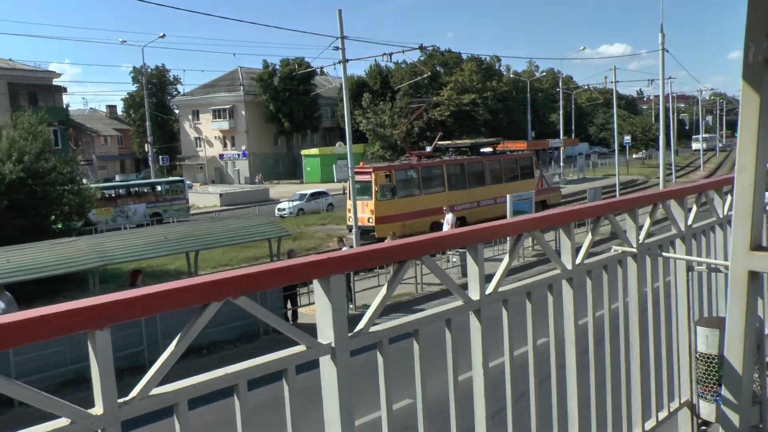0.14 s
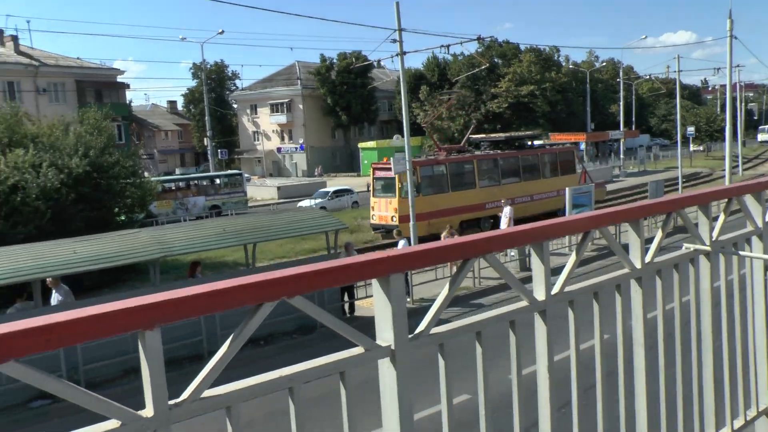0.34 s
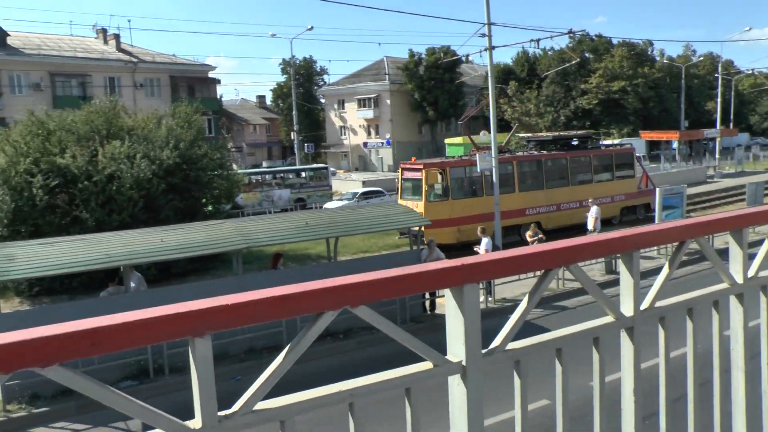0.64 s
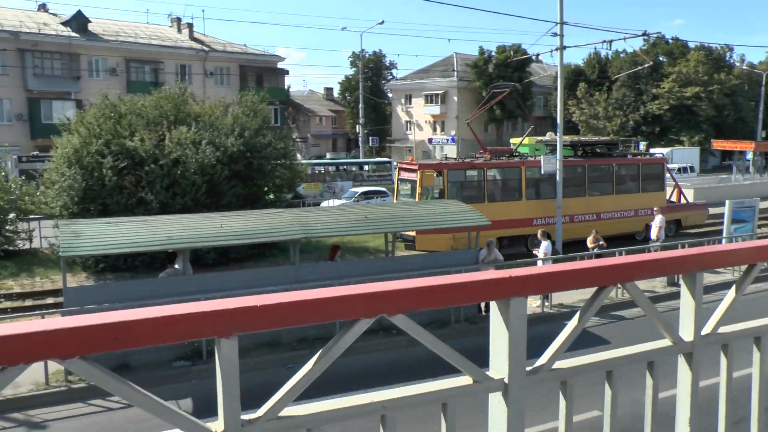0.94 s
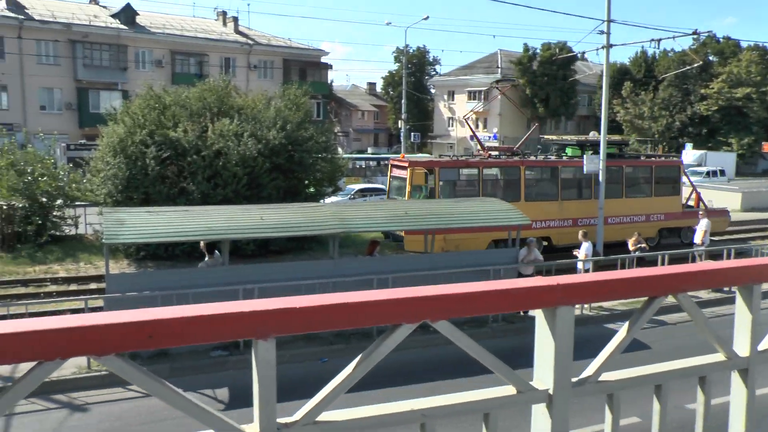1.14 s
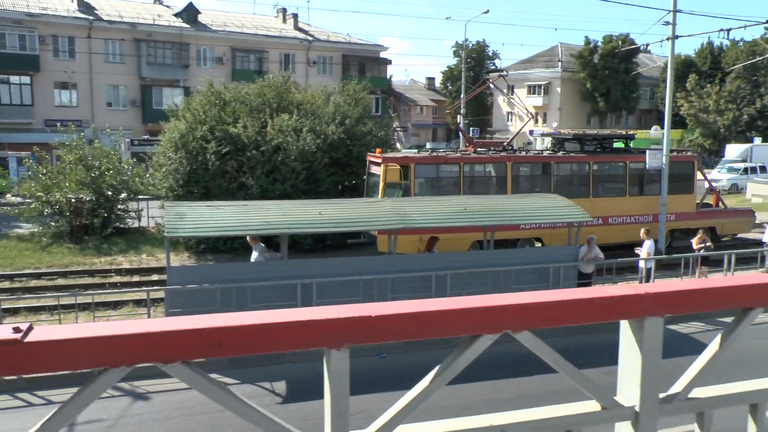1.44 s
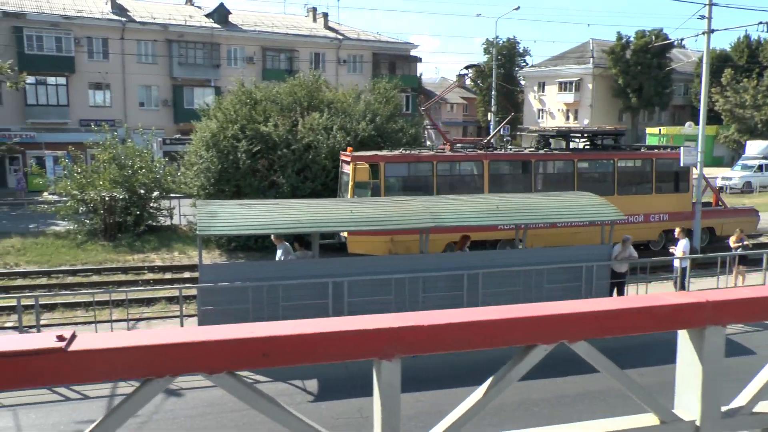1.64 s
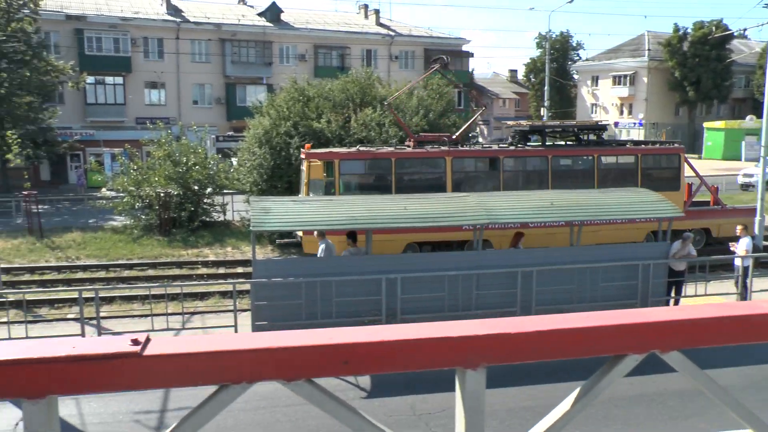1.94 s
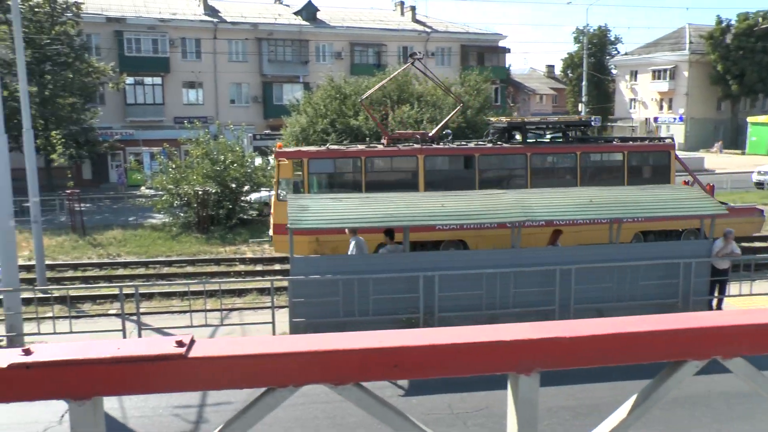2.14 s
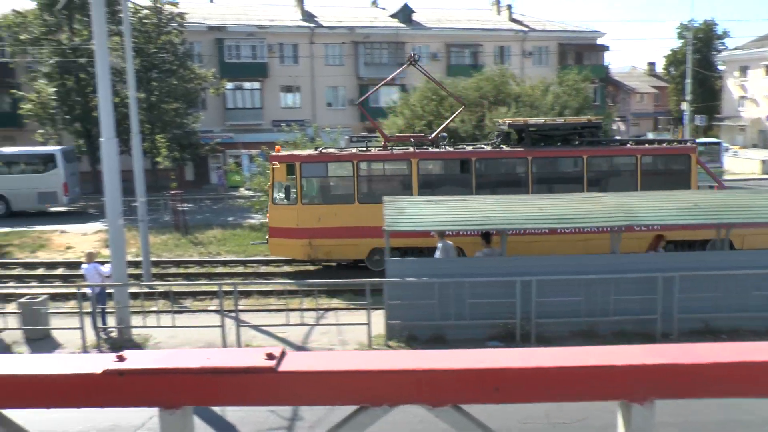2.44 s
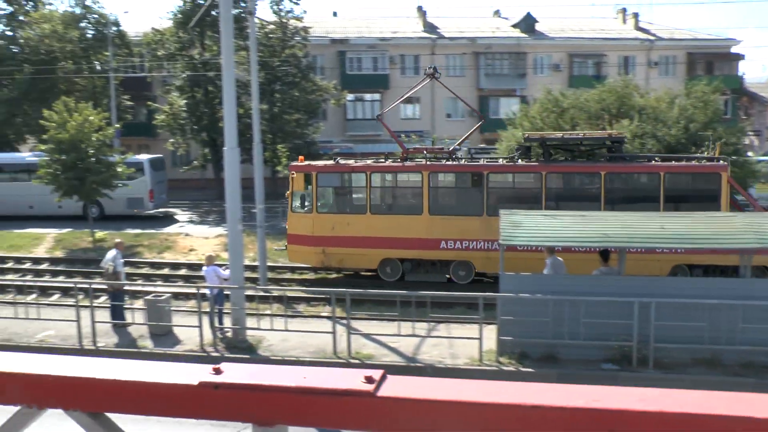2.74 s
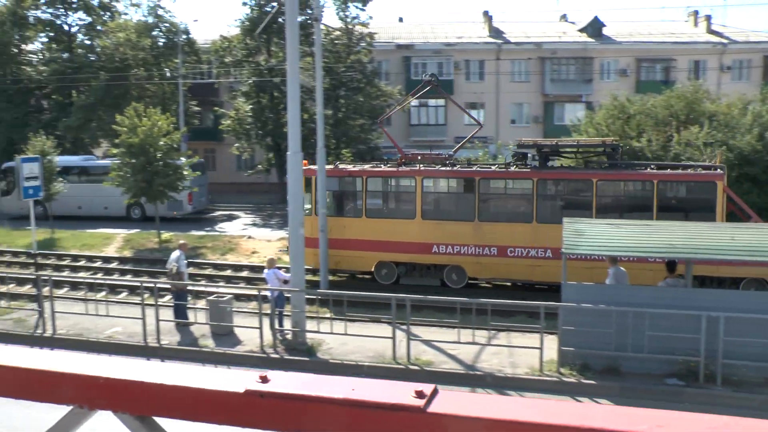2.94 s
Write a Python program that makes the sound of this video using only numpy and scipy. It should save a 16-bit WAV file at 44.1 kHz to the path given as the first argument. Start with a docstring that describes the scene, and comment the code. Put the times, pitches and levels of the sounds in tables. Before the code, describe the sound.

Low wheel-on-rail rumble and road hiss continue throughout as a tram nears; knocks come early, sharp squeals and loose metal jingling later, with wind buffeting the small handheld microphone and the level dipping suddenly at times.

```python
"""Low wheel-on-rail rumble under broad traffic hiss: a tram nears a street stop, heard from a footbridge.
Shaped noise makes rumble, hiss, hum, jingle and wind puffs on two microphone ports; resonant noise makes loose
metal rattles and bright squeal onsets; bursts with decaying rail modes make knocks, wavering sines and scrape
noise make squeals. The small microphone has notches in its colour; the level drops suddenly and recovers."""
import sys
import numpy as np
from scipy import signal
from scipy.fft import rfft, irfft, next_fast_len
from scipy.io import wavfile
from scipy.ndimage import uniform_filter1d, map_coordinates

SR = 44100
rng = np.random.default_rng(int(sys.argv[2]) if len(sys.argv) > 2 else 0)


def unload_audio(sound):
    """Save the sound as a 16-bit wav file, at the path given as the first command line argument."""
    columns = np.transpose(np.atleast_2d(sound))
    # keep every value between -1 and 1, then stretch to whole-number steps
    steps = np.round(np.clip(columns, -1, 1) * 32767)
    wavfile.write(sys.argv[1], SR, steps.astype(np.int16))


def amplitude_ratio(level_db):
    """Convert a level in decibels to the matching linear amplitude (field) ratio."""
    exponent = np.asarray(level_db, float) / 20
    return 10 ** exponent


N = 136269


def along(points, hz):
    """Interpolate (Hz, value) points on a log frequency axis."""
    point_hz, value = np.transpose(points)
    return np.interp(np.log(hz + 1), np.log(point_hz + 1), value)


def curve(rows):
    """Interpolate (seconds, value) rows to one value per sample."""
    return np.interp(np.arange(N) / SR, *np.transpose(rows))


def unit(x):
    """Scale to rms 1."""
    return x / np.sqrt(np.mean(x ** 2) + 1e-20)


def wobble(knots_per_s):
    """Smooth random curve through normal-distributed knots."""
    return map_coordinates(rng.standard_normal(500), [np.arange(N) * knots_per_s / SR])


def filtered(x, response):
    """Multiply the spectrum of x by a response of frequency."""
    size = next_fast_len(N + 8192)
    return irfft(rfft(x, size) * response(np.fft.rfftfreq(size, 1 / SR)), size)[..., :N]


def rush(spectrum, alike, patchy_db):
    """Stereo noise of rms 1: random gain patches in time and frequency, set left-right correlation."""
    grid = signal.stft(rng.standard_normal((2, N)), nperseg=512)[2]
    patches = uniform_filter1d(rng.standard_normal(grid.shape[1:]), size=6, axis=0)
    patches = uniform_filter1d(patches, size=8, axis=1)
    pair = signal.istft(grid * amplitude_ratio(patchy_db * unit(patches)), nperseg=512)[1][:, :N]

    def mid_side_gain(hz):
        angle = np.arccos(np.clip(along(alike, hz), -1, 1)) / 2
        return amplitude_ratio(along(spectrum, hz)) * [np.cos(angle), np.sin(angle)]

    mid, side = filtered(pair, mid_side_gain)
    return unit(np.array([mid + side, mid - side]))


def after(start_s):
    """Seconds since start_s, zero before it."""
    return np.maximum(np.arange(N) / SR - start_s, 0)


def blow(start_s, rise_s, t60_s, hold_s=0):
    """Envelope: linear rise, exponential decay starting hold_s after the start."""
    return np.minimum(after(start_s) / rise_s, 1) * amplitude_ratio(-60 * after(start_s + hold_s) / t60_s)


# Rolling level. Each row: time in seconds, level in dB.
ROLL_LEVEL = [(0.09, -32), (0.45, -30), (0.47, -34.5), (0.67, -31), (0.82, -33.5), (0.87, -30.5),
              (1.43, -31), (1.51, -37.5), (1.55, -29), (2.09, -32.5), (2.3, -32.5), (2.4, -38),
              (2.52, -28.5), (2.62, -33.5), (2.99, -28.5), (3.02, -32.5), (3.06, -30.5), (3.09, -32.5)]
# Rumble spectrum. Each row: frequency in Hz, relative density in dB per Hz.
RUMBLE_SPECTRUM = [(20, -34), (40, -8.5), (90, -2.5), (300, -4), (450, -10.5), (800, -9), (950, -23),
                   (1500, -71.5)]
# Rumble stereo. Each row: frequency in Hz, left-right correlation (no unit).
RUMBLE_CORRELATION = [(40, .73), (150, .68), (600, .8)]


def rumble():
    """Wheels on rails: low noise with a lumpy level."""
    lumps_db = 1.6 * wobble(16) + 0.5 * wobble(49)
    left_over_right_db = -1
    balance_db = left_over_right_db * np.array([[0.5], [-0.5]])
    noise = rush(RUMBLE_SPECTRUM, RUMBLE_CORRELATION, patchy_db=0.5)
    return amplitude_ratio(curve(ROLL_LEVEL) + lumps_db + balance_db) * noise


# Street hiss level. Each row: time in seconds, level in dB.
STREET_LEVEL = [(.09, -35.5), (.3, -37.5), (.5, -40.5), (.62, -38), (.76, -39.5), (1.0, -37.5),
                (1.2, -38.5), (1.38, -40.5), (1.57, -40.5), (1.75, -42.5), (1.95, -41), (2.05, -40.5),
                (2.2, -39), (2.4, -41.5), (2.49, -40), (2.62, -37), (2.9, -38), (3.09, -37.5)]
# Near hiss spectrum. Each row: frequency in Hz, relative density in dB per Hz.
HISS_SPECTRUM = [(100, -34), (600, -9.5), (1000, -3), (1680, -1.5), (2000, 0.5), (3760, -6.5),
                 (5900, -14.5), (6800, -19), (9000, -29.5), (11100, -41.5), (14000, -60), (15200, -57),
                 (16400, -66)]
# Stereo of the hiss, hum, jingle, knock bursts and scrape noise.
# Each row: frequency in Hz, left-right correlation (no unit).
HISS_CORRELATION = [(800, 0.79), (2000, 0.89), (6000, 0.96), (8500, 0.84), (10000, 1)]
# Far tram colour, hollower and duller. Each row: frequency in Hz, gain over the near hiss in dB.
FAR_COLOUR = [(900, 0), (1400, 0.5), (1560, 2), (1650, 0.5), (1800, -1.5), (2800, -3), (3800, -3),
              (7000, -1)]
# Approach. Each row: time in seconds, share of the far colour (0 to 1).
FAR_SHARE = [(.1, 1), (1.0, 0.49), (2.0, 0), (3.09, 0)]


def street():
    """Tyres and rolling steel: one broad hiss that opens up as the tram nears."""
    near = rush(HISS_SPECTRUM, HISS_CORRELATION, patchy_db=1.0)
    far = filtered(near, lambda hz: amplitude_ratio(along(FAR_COLOUR, hz)))
    far_share = np.clip(curve(FAR_SHARE), 0, 1)
    hiss = far_share * far + (1 - far_share) * near
    lumps_db = 0.47 * wobble(25.81) + 0.62 * wobble(39.76)
    return amplitude_ratio(curve(STREET_LEVEL) + lumps_db) * hiss


# Gust strength. Each row: time in seconds, level in dB.
WIND_LEVEL = [(0.09, -54), (0.4, -51), (0.46, -41), (0.55, -54), (0.8, -39), (1.0, -49), (1.1, -38),
              (1.22, -34), (1.3, -47), (1.38, -37), (1.49, -63), (1.57, -33), (1.68, -38), (1.8, -36),
              (1.89, -25.5), (1.96, -39), (2.03, -22), (2.12, -46), (2.21, -22), (2.3, -36), (2.45, -31),
              (2.57, -40), (2.64, -30), (2.7, -25), (2.78, -45), (2.85, -41), (2.94, -42), (3.09, -62)]
# Puff spectrum. Each row: frequency in Hz, relative density in dB per Hz.
PUFF_SPECTRUM = [(30, -27), (130, 4), (240, -6.5), (400, 6.5), (600, 4.5), (820, -8), (950, -21),
                 (1300, -9), (2200, -120)]


def wind():
    """Puffs: one gust for both ports, partly opposite in pressure, plus lumps of each port's own."""
    shared_lumps_db = 2.8 * wobble(25.1)
    port_lumps_db = np.array([3.23 * wobble(8.3), 1.2 * wobble(22.9)])
    correlation = [(100, -0.18), (400, -0.76), (800, -0.92)]  # (Hz, left-right)
    noise = rush(PUFF_SPECTRUM, correlation, patchy_db=5.5)
    return amplitude_ratio(curve(WIND_LEVEL)) * unit(amplitude_ratio(shared_lumps_db + port_lumps_db) * noise)


# Hollow rolling band. Each row: time in seconds, level in dB.
HUM_LEVEL = [(.09, -52), (.9, -46.5), (1.5, -51.5), (2.2, -55), (2.5, -58), (3.09, -55)]
# Hum spectrum. Each row: frequency in Hz, relative density in dB per Hz.
HUM_SPECTRUM = [(1540, -40), (1630, 0), (1740, -2), (1900, -14), (2200, -40)]


def hum():
    """A narrow hollow band of the rolling noise swells and wavers."""
    return amplitude_ratio(curve(HUM_LEVEL) + 2 * wobble(18)) * rush(HUM_SPECTRUM, HISS_CORRELATION, patchy_db=3)


# Shivering small parts. Each row: time in seconds, level in dB.
JINGLE_LEVEL = [(.09, -78), (.8, -66), (1.5, -53), (2.0, -56), (2.4, -55), (2.6, -47.5), (3.09, -49.5)]
# Jingle spectrum. Each row: frequency in Hz, relative density in dB per Hz.
JINGLE_SPECTRUM = [(2500, -42), (4500, 2.5), (6500, 1), (9000, -12), (12000, -21), (15500, -23)]


def jingle():
    """Countless small parts shiver: fine ticks on a patchy treble."""
    ticks_db = 2 * wobble(35) + 6 * np.clip(wobble(150) - 0.8, 0, 1.2)
    noise = rush(JINGLE_SPECTRUM, HISS_CORRELATION, patchy_db=2.2)
    return amplitude_ratio(curve(JINGLE_LEVEL)) * unit(amplitude_ratio(ticks_db) * noise)


# Jolts of loose metal, and the bright treble bursts that start the flange squeals.
# Each row: start in seconds, level before the envelope in dB, brightest frequency in Hz.
METAL_BURSTS = [(0.101, -52, 7150), (0.131, -63.5, 6500), (.935, -60, 15500), (1.139, -62, 11000),
                (1.245, -57, 12800), (1.28, -67, 14600), (1.435, -62, 14000), (1.655, -52, 14000),
                (1.73, -66, 8100), (1.959, -59, 12400), (1.971, -50, 10000), (1.978, -45, 7900),
                (2.033, -47, 6500), (2.175, -55, 9300), (2.219, -50, 7350), (2.285, -73.5, 15000),
                (2.5, -52, 14500), (2.545, -53, 15000), (2.574, -47.5, 9300), (2.59, -60, 13000),
                (2.665, -59, 5900), (2.729, -56, 13500), (2.768, -58, 11300), (2.906, -49, 8700),
                (2.92, -73, 13000), (3.011, -51, 7400), (3.07, -57, 13600)]
# Metal resonances. Each entry: frequency in Hz.
PLATE_MODES_HZ = [5700, 6500, 7400, 8060, 7800, 8700, 9740, 10100, 11800, 12400, 13600, 14600, 15500]


def rattles_and_squeal_onsets():
    """Loose metal jolts and bright squeal onsets: noise through resonances, strongest near each burst's pitch."""
    rise_s, t60_s = 0.0037, 0.14
    half_width_hz, ring_db, ring_scatter_db, slope_db_per_octave = 75, 12, 6, 20
    out, t = np.zeros(N + SR), np.arange(SR // 4) / SR
    hz = np.fft.rfftfreq(len(t), 1 / SR)
    mode_hz = np.array(PLATE_MODES_HZ)[:, None]
    peaks = 1 / (1 + ((hz - mode_hz) / half_width_hz) ** 2)
    envelope = amplitude_ratio(-60 * t / t60_s) * (1 - np.exp(-t / rise_s))
    for start_s, level_db, bright_hz in METAL_BURSTS:
        luck = rng.standard_normal((len(mode_hz), 1))
        noise = rng.standard_normal(len(t))
        tilt = amplitude_ratio(-slope_db_per_octave * np.abs(np.log2((hz + 1) / bright_hz)))
        ringing = (amplitude_ratio(ring_db + ring_scatter_db * luck) * peaks).sum(axis=0)
        burst = unit(irfft(rfft(noise) * tilt * (1 + ringing), len(t)))
        out[round(start_s * SR):][:len(t)] += amplitude_ratio(level_db) * envelope * burst
    return out[:N]


# Rail joint knocks. Each row: start in seconds, burst level in dB, ring level in dB,
# dullness in dB per octave above 800 Hz.
JOINT_KNOCKS = [(0.256, -31, -41, 6), (0.326, -32, -42, 4), (0.56, -33, -43, 5), (1.429, -30, -33, 9),
                (1.437, -33, -34, 7), (2.279, -32, -36, 0), (2.285, -33, -33, 2), (2.503, -30, -35, 5),
                (2.525, -33, -37, 7)]
# Burst spectrum. Each row: frequency in Hz, relative density in dB per Hz.
KNOCK_SPECTRUM = [(100, -16), (300, -6), (550, 5), (850, 6), (1000, -5), (2000, -9), (4000, -20),
                  (8000, -36), (16000, -46)]
# Rail modes. Each row: frequency in Hz, level before dullness and scatter in dB, t60 in seconds.
RAIL_MODES = [(420, -4, .07), (600, 2, .08), (780, 2, .1), (1095, -4, .06), (1400, -6, .05),
              (1675, -7, .06), (1950, -3, .07), (2330, -7, .05), (2900, -9, .04), (3400, -11, .04)]


def knocks():
    """Wheels knock over rail joints: a short dull burst, and the rail rings in decaying modes."""
    dull_from_hz, scatter_db, ring_rise_s = 800, 3, 0.0015
    burst_rise_s, burst_t60_s = 0.00089, 0.076
    hz, mode_db, t60_s = np.transpose(RAIL_MODES)[..., None]
    octaves_up = np.maximum(np.log2(hz / dull_from_hz), 0)
    ring, burst = 0, 0
    for start_s, burst_db, ring_db, dull_db in JOINT_KNOCKS:
        luck, phase_cycles = rng.standard_normal((2, len(RAIL_MODES), 1))
        t = after(start_s)
        decaying_db = mode_db - dull_db * octaves_up + scatter_db * luck - 60 * t / t60_s
        modes = amplitude_ratio(decaying_db) * np.sin(2 * np.pi * (hz * t + phase_cycles))
        ring = ring + amplitude_ratio(ring_db) * np.minimum(t / ring_rise_s, 1) * modes.sum(axis=0)
        burst = burst + amplitude_ratio(burst_db) * blow(start_s, burst_rise_s, burst_t60_s)
    return ring + burst * rush(KNOCK_SPECTRUM, HISS_CORRELATION, patchy_db=2.0)


# Flange squeals. Each row: start in seconds, time to decay onset in seconds, level before wavering in dB,
# pitch in Hz.
FLANGE_SQUEALS = [(1.436, 0.025, -40, 4725), (1.652, 0.028, -37, 4725), (1.715, .02, -54, 4725),
                  (2.272, .012, -52, 4740), (2.357, .03, -50, 4750), (2.492, 0.042, -43, 4780),
                  (2.535, .018, -51, 4780), (2.57, .03, -52, 4780)]
# Scrape spectrum. Each row: frequency in Hz, relative density in dB per Hz.
SCRAPE_SPECTRUM = [(300, -20), (800, -2), (2000, 17), (5000, -2), (9000, -14), (12000, -30), (16000, -32)]


def squeals():
    """A flange scrapes the rail: wheel modes build up unevenly, hold and die over scrape noise."""
    rise_s, t60_s = 0.0089, 0.11
    scrape_rise_s, scrape_t60_s, scrape_over_song_db = 0.0031, 0.29, 2
    shaky_s = np.arange(N) / SR + 2.5e-5 * wobble(130)
    uneven = amplitude_ratio(3 * wobble(150))
    # a high wheel mode sings along
    upper = amplitude_ratio(-25 + 4 * wobble(90)) * np.sin(2 * np.pi * 13820 * shaky_s)
    song, scrape = 0, 0
    for start_s, hold_s, level_db, pitch_hz in FLANGE_SQUEALS:
        tone = uneven * np.sin(2 * np.pi * pitch_hz * shaky_s) + upper
        song = song + amplitude_ratio(level_db) * blow(start_s, rise_s, t60_s, hold_s) * tone
        scrape = scrape + amplitude_ratio(level_db + scrape_over_song_db) * blow(start_s, scrape_rise_s, scrape_t60_s)
    return song + scrape * rush(SCRAPE_SPECTRUM, HISS_CORRELATION, patchy_db=2)


def scene():
    """Sum all sources."""
    rolling = rumble() + street() + wind() + hum() + jingle()
    return rolling + rattles_and_squeal_onsets() + knocks() + squeals()


def roll_off(x):
    """The treble ends steeply here."""
    return signal.sosfilt(signal.butter(12, 16440, fs=SR, output="sos"), x)


# Microphone colour. Each row: centre in Hz, half width at 1/e of the depth in Hz,
# depth in dB (negative = peak).
MIC_NOTCHES = [(492, 38, 10), (650, 28, 7), (290, 40, -2), (910, 50, 4), (1090, 30, -2), (1165, 28, 5),
               (1235, 25, 3), (1290, 36, 10), (1360, 50, 2), (1553, 36, 12), (1700, 110, -2),
               (16500, 700, 14)]
# Sudden level drops. Each row: start in seconds, drop in dB.
LEVEL_DROPS = [(.335, 2), (0.422, 4), (0.766, 1.5), (1.016, 5), (1.392, 5), (1.572, 4), (2.644, 7),
               (2.934, 2.5)]


def record(dry):
    """Microphone notches, sudden level drops with a slower return, and the opening from silence."""
    drop_s, recover_s = 0.001, 0.07  # linear fall, time constant of return
    open_at_s, open_rise_s = 0.08, 0.0017

    def mic_gain(f):
        return amplitude_ratio(-sum(db * np.exp(-((f - hz) / width_hz) ** 2) for hz, width_hz, db in MIC_NOTCHES))

    notched = filtered(dry, mic_gain)
    drop_db = 0
    for start_s, db in LEVEL_DROPS:
        t = after(start_s)
        drop_db = drop_db + db * np.minimum(t / drop_s, 1) * np.exp(-t / recover_s)
    opening = np.minimum(after(open_at_s) / open_rise_s, 1)
    return roll_off(notched * amplitude_ratio(-drop_db) * opening)


dry = scene()
out = record(dry)
unload_audio(out)
```